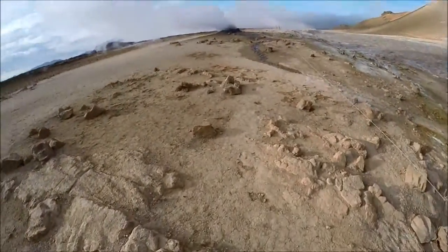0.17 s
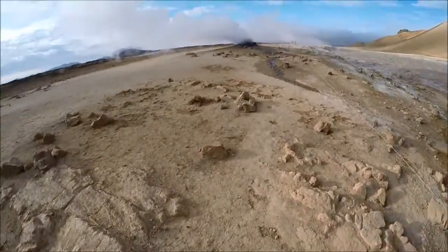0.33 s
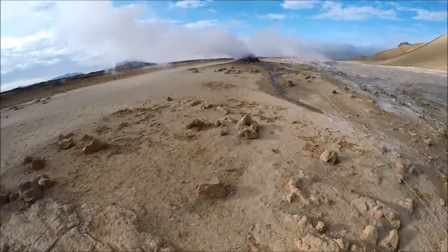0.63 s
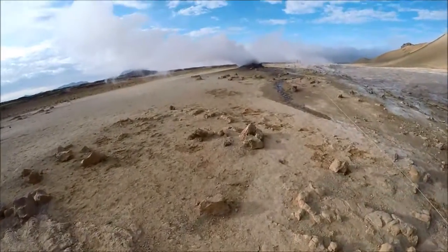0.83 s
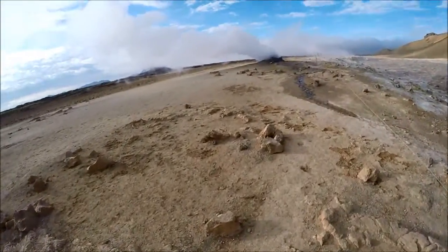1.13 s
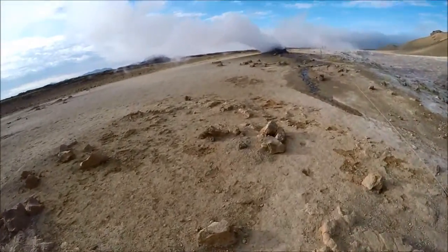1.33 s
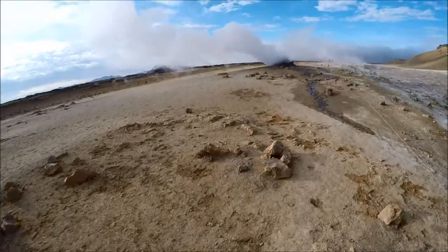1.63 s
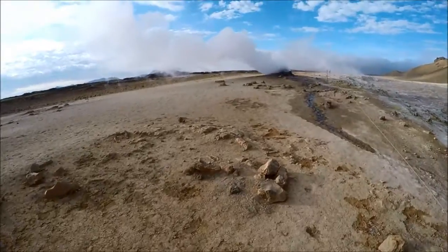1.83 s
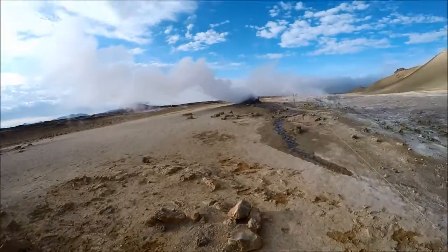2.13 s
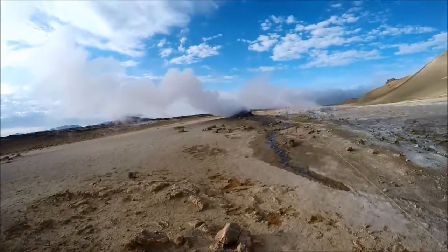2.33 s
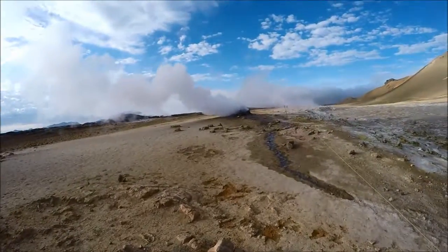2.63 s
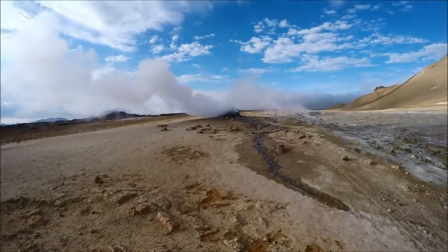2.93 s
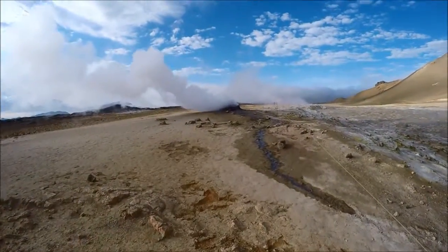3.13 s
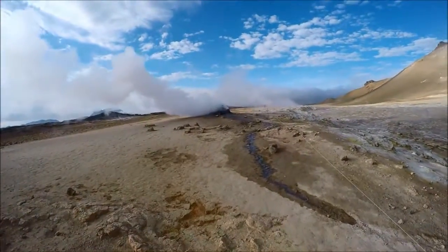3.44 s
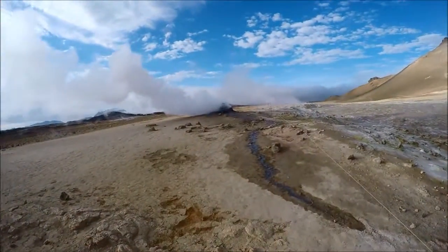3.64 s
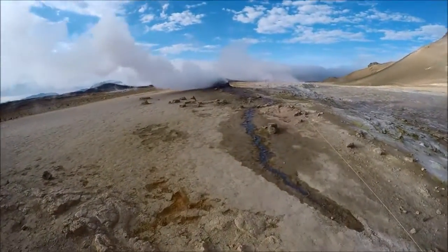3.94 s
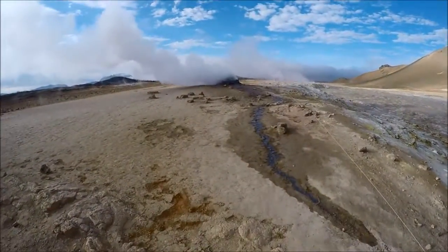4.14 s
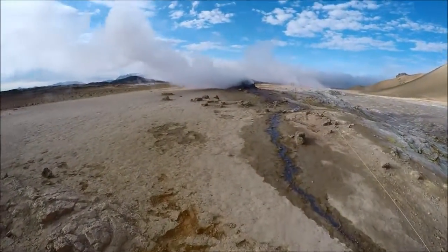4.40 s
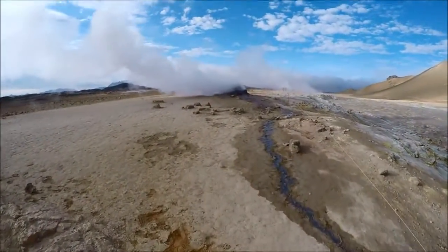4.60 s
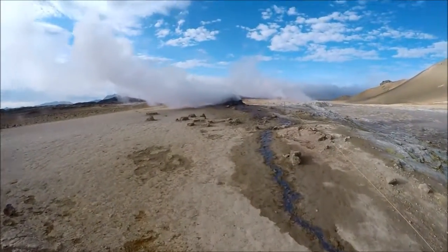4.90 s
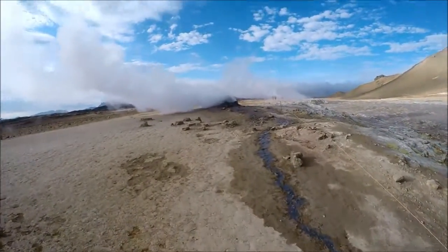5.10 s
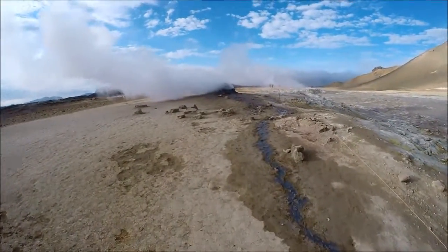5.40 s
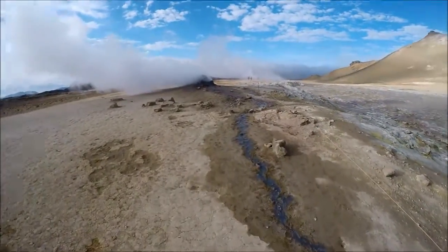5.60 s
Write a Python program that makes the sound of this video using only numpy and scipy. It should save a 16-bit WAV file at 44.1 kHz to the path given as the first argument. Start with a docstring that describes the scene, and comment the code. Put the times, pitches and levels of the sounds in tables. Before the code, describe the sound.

Steam hisses and roars steadily from a ground vent outdoors, slowly swelling, while deep dull footstep thumps shake the carried microphone.

```python
"""A steam vent on open rocky ground roars, hisses and whistles from the start, as banded noise; its roar
swells as someone walks nearer. Microphone hiss, thin whines and a low handling rumble lie below.
Then footfalls reach the carried microphone through the body as deep decaying sways: heel, sole and a
smaller rebound, then a trembling of the hand. Twice a pebble knocks under the boot, as short
ringing modes in a scuff of grit. Two shifts of the grip add smaller thumps between steps."""
import sys
import numpy as np
from scipy import signal
from scipy.fft import rfft, irfft
from scipy.io import wavfile

SR = 44100
rng = np.random.default_rng(int(sys.argv[2]) if len(sys.argv) > 2 else 0)


def log_audio(samples):
    """Write samples as a 16-bit WAV file to the path given in sys.argv[1]."""
    # one column per channel
    frames = np.atleast_2d(samples).T
    # limit to full scale, then quantise
    limited = np.clip(frames, -1, 1)
    pcm = np.round(limited * 32767).astype(np.int16)
    wavfile.write(sys.argv[1], SR, pcm)


N = 254016   # length in samples
TIME = np.arange(N) / SR   # s
FREQS = np.maximum(np.arange(N // 2 + 1) * SR / N, 1)   # Hz, kept above 0 for the logarithm


def from_db(db):
    """Decibels to gain."""
    return 10 ** (np.asarray(db) / 20)


def rms(x):
    """Root mean square."""
    return np.sqrt(np.mean(x ** 2) + 1e-20)


def in_time(rows):
    """Each level column of a table, joined by straight lines sample by sample."""
    times, *columns = np.transpose(rows)
    return [np.interp(TIME, times, column) for column in columns]


def slope(points):
    """A spectrum in dB, joined by straight lines on a log-frequency axis."""
    hz, db = np.transpose(points)
    return np.interp(np.log(FREQS), np.log(hz), db)


def bell(offset, width):
    """A smooth hump of height 1, down to 1/e at the width on either side."""
    return np.exp(-(offset / width) ** 2)


def noise(gain):
    """Random noise shaped by a gain per frequency, brought to rms 1."""
    white = rng.standard_normal(N)
    shaped = irfft(rfft(white) * gain, N)
    return shaped / rms(shaped)


def drift(rate_hz):
    """Slow random wander of rms 1, changing about rate_hz times a second."""
    return noise(bell(FREQS, rate_hz))


# strength of the jet's finer eddies: t/s, hiss level/dB, sizzle level/dB
JET_LEVELS = [(0.0, -60.5, -69.5), (0.36, -55, -65), (0.48, -61, -68.4), (0.88, -55, -67.5),
              (0.96, -56.5, -63.5), (1.28, -57.5, -69), (1.4, -56.5, -65.5), (1.68, -54.5, -67),
              (1.84, -59, -68), (1.92, -54, -65), (2.36, -57, -67), (2.68, -54.5, -62.5),
              (2.84, -55, -65.5), (3.48, -56.5, -66.5), (4.12, -53, -65.5), (4.68, -54.5, -64.5),
              (5.64, -55.5, -62.5), (5.76, -52.5, -62.5)]
# broad tilt of the steam noise: f/Hz, relative level/dB per Hz
STEAM_SPECTRUM = [(90, -3.5), (190, -3), (330, -6.5), (520, -5.5), (810, -1), (1080, -6.5), (1450, 2.5),
                  (2600, -0.5), (3200, -4), (3950, -11), (5600, -11.5), (6150, -20.5), (7800, -28.5),
                  (11000, -48)]
# peaks and hollows on that tilt: f/Hz, width/Hz, level/dB
STEAM_COLOUR = [(1257, 96, -9.5), (1450, 63, 0.5), (1589, 148, -5), (1995, 122, -13), (2250, 64, -6),
                (2390, 70, -0.5), (3103, 146, -8.5), (3570, 190, 4), (4265, 80, -5.5), (4630, 280, 4.5),
                (4990, 140, -3), (7000, 220, -4)]


def steam(roar_db=-58, roar_db_per_s=0.41, upper_db=1.0, upper_db_per_s=-0.37, eddy_db=0.72, eddy_hz=14):
    """Jet turbulence: large eddies roar, small ones hiss, the finest sizzle; all share one colour."""
    spectrum_db = slope(STEAM_SPECTRUM)
    for hz, width_hz, db in STEAM_COLOUR:
        spectrum_db = spectrum_db + db * bell(FREQS - hz, width_hz)
    colour = from_db(spectrum_db)

    hiss, sizzle = in_time(JET_LEVELS)
    roar = roar_db + roar_db_per_s * TIME   # the deep part grows steadily as the vent comes nearer
    # eddies between hiss and sizzle follow both, but grow less
    upper = (hiss + sizzle) / 2 + upper_db + upper_db_per_s * TIME

    eddy_size = np.digitize(FREQS, [1600, 3120, 4300])   # band edges in Hz
    out = 0
    for size, level in enumerate([roar, hiss, upper, sizzle]):
        band = noise(colour * (eddy_size == size))
        out = out + band * from_db(level + eddy_db * drift(eddy_hz))
    return out


# the breathy whistle coming and going: t/s, level/dB
WHISTLE_LEVEL = [(0, -78.5), (1.75, -79), (2.2, -94), (3.45, -91), (3.9, -79), (5.1, -88), (5.76, -79)]


def whistle(centre_hz=6720, width_hz=330, wander_hz=90, flutter_db=2.0):
    """A breathy band of the jet: slow noise carried on a tone that wavers in pitch."""
    level, = in_time(WHISTLE_LEVEL)
    turns = np.cumsum(centre_hz + wander_hz * drift(4.5)) / SR
    breath = noise(bell(FREQS, width_hz))
    band = np.sqrt(2) * breath * np.sin(2 * np.pi * turns)   # root 2 keeps rms 1
    return band * from_db(level + flutter_db * drift(31))


# tilt of the microphone hiss: f/Hz, relative level/dB per Hz
HISS_SPECTRUM = [(100, 0), (8000, 0), (11000, -3), (13500, -0.5), (14500, -4), (15300, -11)]
# faint steady electronic tones: f/Hz, rms level/dB
WHINE_TONES = [(9770, -101), (12228, -102), (13900, -94), (13950, -109)]


def electronics(hiss_db=-71.0, flicker_db=0.5):
    """Nearly even microphone hiss with a few thin steady tones."""
    hiss = noise(from_db(slope(HISS_SPECTRUM))) * from_db(hiss_db + flicker_db * drift(12))
    whine = 0
    for hz, db in WHINE_TONES:
        whine = whine + np.sqrt(2) * from_db(db) * np.sin(2 * np.pi * hz * TIME)
    return hiss + whine


# tilt of the handling rumble: f/Hz, relative level/dB per Hz
RUMBLE_SPECTRUM = [(10, -9.5), (22, -3), (40, 0.5), (62, -1.5), (72, -11), (84, -18), (102, -18.5),
                   (120, -26), (250, -41), (1000, -90)]


def handling(rest_db=-48, stride_db=4, stride_s=0.097, waver_db=0.4):
    """The grip rumbles unevenly all the time, more around each footfall."""
    shaken = sum(bell(TIME - heel_s, stride_s) for heel_s, *_ in FOOTFALLS)
    level = rest_db + stride_db * shaken + waver_db * drift(8.8)
    return noise(from_db(slope(RUMBLE_SPECTRUM))) * from_db(level)


def jolt(start_s, peak_db, sway_hz, t60_s, body_cut_hz=69.7, lowest_hz=20):
    """A jolt sets the arm swaying briefly; the soft body lets only the deepest shake through."""
    t = TIME[:SR // 2]
    sway = np.sin(2 * np.pi * sway_hz * t) * from_db(-60 * t / t60_s)
    body = signal.cheby1(6, 1, body_cut_hz, fs=SR, output="sos")
    low_cut = signal.butter(4, lowest_hz, "high", fs=SR, output="sos")
    shake = signal.sosfilt(np.vstack([body, low_cut]), sway)
    thump = -from_db(peak_db) * shake / np.abs(shake).max()
    return np.pad(thump, (round(start_s * SR), N))[:N]


# each step: heel t/s, heel peak level/dB, sway f/Hz, sole t/s after heel, sole peak level/dB,
# rebound t/s after heel, rebound peak level/dB, trembling level/dB
FOOTFALLS = [(0.35, -14.5, 32, 0.0093, -12, .086, -22, -29), (1.008, -10, 29.3, .011, -13, .12, -22, -35.5),
             (1.666, -15, 35, 0.0107, -11, .092, -24.5, -36.5),
             (2.29, -14, 16, 0.026, -27, .112, -24, -39.5),
             (2.915, -14.5, 17, 0.015, -26.5, .131, -22, -29.5),
             (3.541, -24, 31.6, 0.06, -20.5, .203, -27, -35.5),
             (4.217, -18.5, 31, 0.018, -21, .105, -31, -38.5),
             (4.967, -10.2, 35.8, .011, -7.5, .075, -21.5, -31),
             (5.592, -17, 15, 0.012, -23.5, .09, -39, -31.5)]
# the grip shifting between footfalls: t/s, peak level/dB
GRIP_SHIFTS = [(2.183, -26.5), (2.476, -26)]


def thumps(sway_t60_s=0.1, grip_hz=38, grip_t60_s=0.066):
    """Heel and sole sway the arm; the rebound and each shift of the grip shake the hand for less time."""
    out = 0
    for heel_s, heel_db, sway_hz, sole_s, sole_db, rebound_s, rebound_db, _ in FOOTFALLS:
        out = out + jolt(heel_s, heel_db, sway_hz, sway_t60_s)
        out = out + jolt(heel_s + sole_s, sole_db, sway_hz, sway_t60_s)
        out = out + jolt(heel_s + rebound_s, rebound_db, grip_hz, grip_t60_s)
    for shift_s, shift_db in GRIP_SHIFTS:
        out = out + jolt(shift_s, shift_db, grip_hz, grip_t60_s)
    return out


def tremble(centre_hz=45, width_hz=19, late_s=0.11, rise_s=0.07, t60_s=0.55):
    """The hand goes on trembling after each footfall, as deep noise that swells and slowly settles."""
    swell = 0
    for heel_s, *_, tremble_db in FOOTFALLS:
        age = TIME - heel_s - late_s   # s from the height of the swell
        rise = bell(np.minimum(age, 0), rise_s)
        swell = swell + rise * from_db(tremble_db - 60 * np.maximum(age, 0) / t60_s)
    return swell * noise(bell(FREQS - centre_hz, width_hz))


def grit(level_db=-55, centre_hz=1100, width_hz=750, late_s=0.0047, length_s=0.012):
    """Loose grit scuffs around each tipping pebble, as a soft puff of mid-range noise."""
    scuff = sum(bell(TIME - knock_s - late_s, length_s) for knock_s, _ in PEBBLES)
    return from_db(level_db) * scuff * noise(bell(FREQS - centre_hz, width_hz))


# pebbles knocking under the boot: t/s, level/dB
PEBBLES = [(0.422, -44), (1.687, -38.5)]
# ringing modes of a pebble: f/Hz, level/dB relative to the knock, decay t60/s
PEBBLE_MODES = [(650, 2.5, 0.012), (910, -4, 0.0078), (1080, 6.5, 0.008), (1500, -10, 0.0072)]


def pebbles(contact_s=0.00069):
    """A stone tips against soft ground, which rounds its onset, and rings very briefly."""
    out = np.zeros(N)
    for knock_s, knock_db in PEBBLES:
        t = np.clip(TIME - knock_s, 0, 0.2)   # the ring has died away long before 0.2 s
        push = 1 - bell(t, contact_s)
        for hz, mode_db, t60_s in PEBBLE_MODES:
            decay = from_db(knock_db + mode_db - 60 * t / t60_s)
            out += push * decay * np.sin(2 * np.pi * hz * t)
    return out


def scene():
    """Open ground, no echoes: everything sums at one microphone."""
    vent = steam() + whistle()
    carried = electronics() + handling()
    steps = thumps() + tremble() + grit() + pebbles()
    return (vent + carried + steps)[None]


def record(dry, cutoff_hz=15300):
    """A steep low-pass cuts off the top."""
    top_cut = signal.ellip(12, 0.1, 90, cutoff_hz, fs=SR, output="sos")
    return signal.sosfilt(top_cut, dry)


dry = scene()
out = record(dry)
log_audio(out)
```